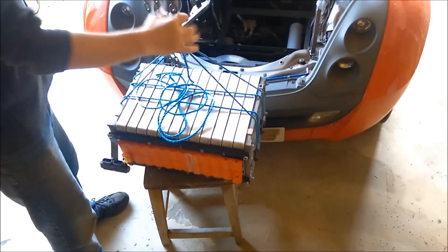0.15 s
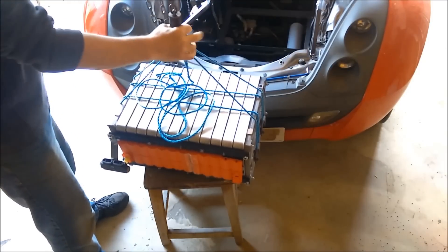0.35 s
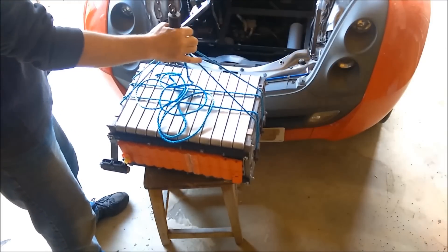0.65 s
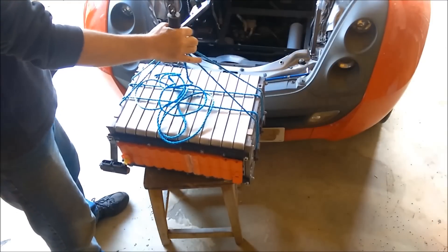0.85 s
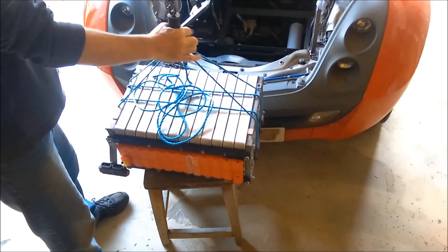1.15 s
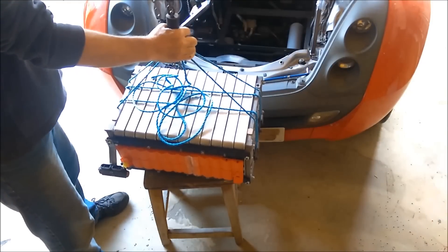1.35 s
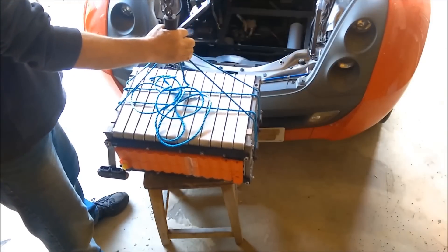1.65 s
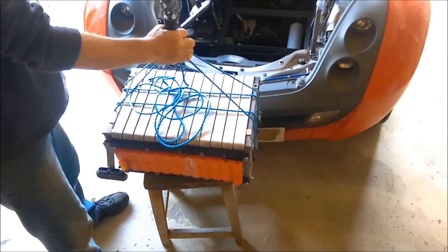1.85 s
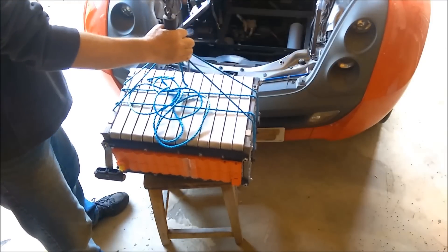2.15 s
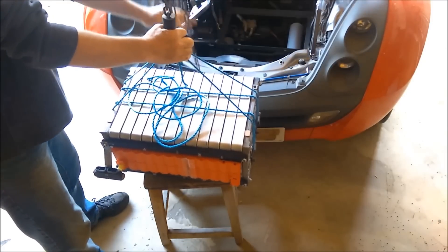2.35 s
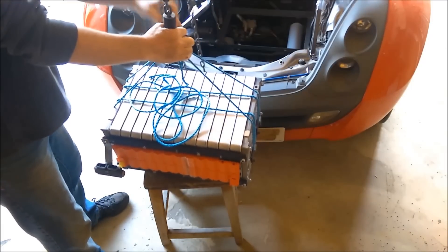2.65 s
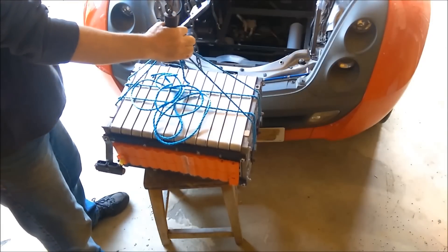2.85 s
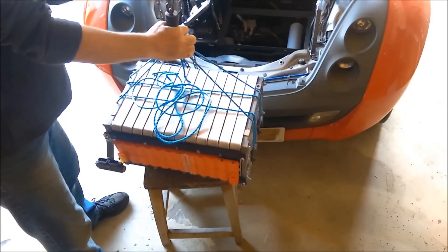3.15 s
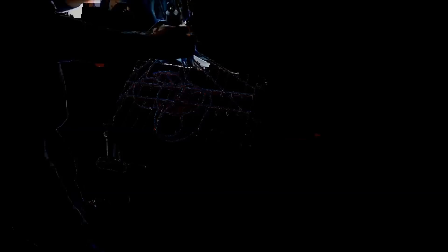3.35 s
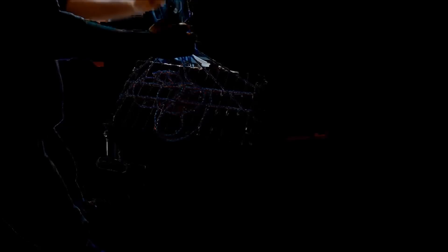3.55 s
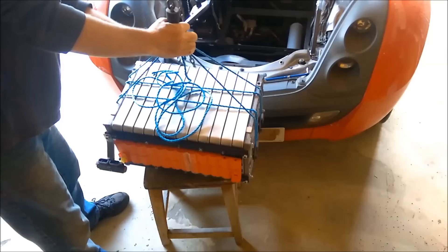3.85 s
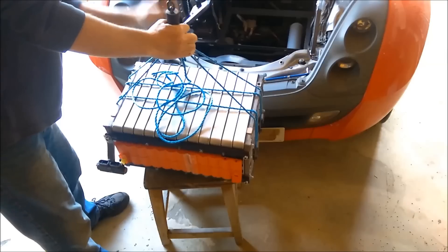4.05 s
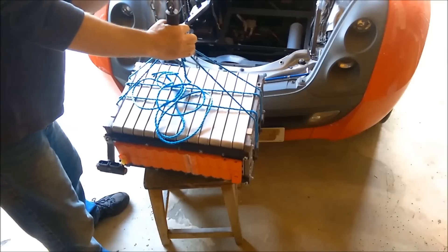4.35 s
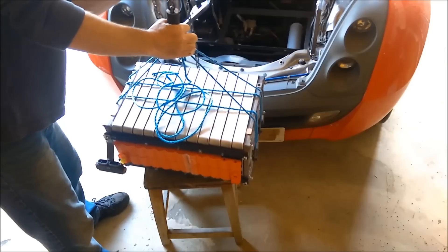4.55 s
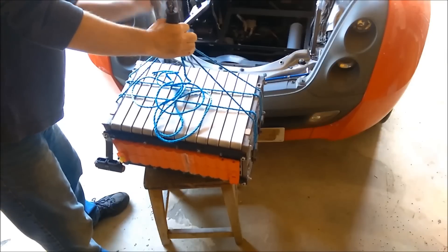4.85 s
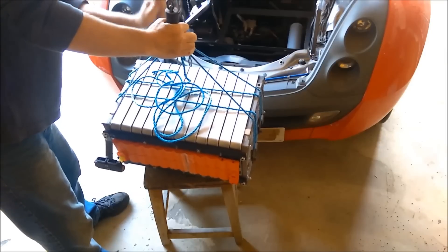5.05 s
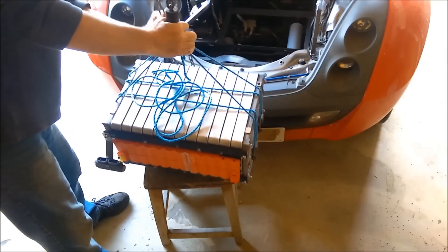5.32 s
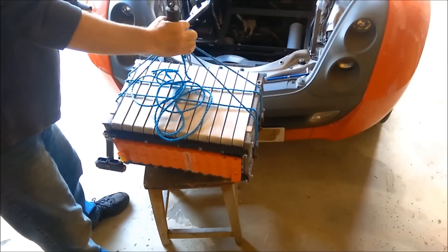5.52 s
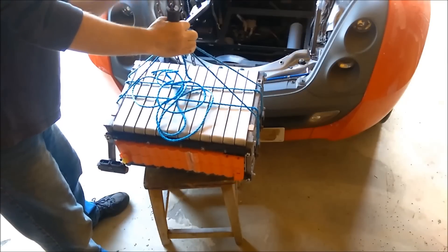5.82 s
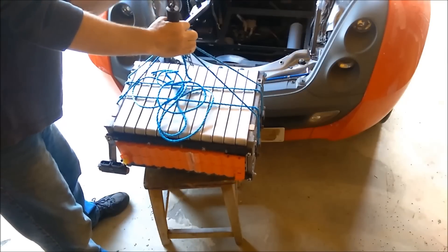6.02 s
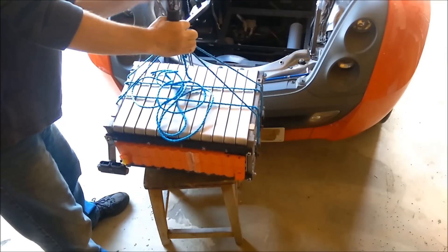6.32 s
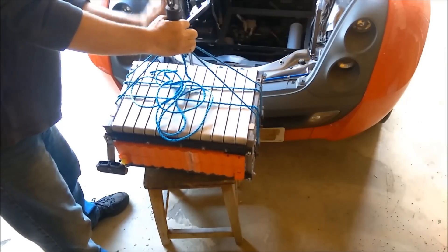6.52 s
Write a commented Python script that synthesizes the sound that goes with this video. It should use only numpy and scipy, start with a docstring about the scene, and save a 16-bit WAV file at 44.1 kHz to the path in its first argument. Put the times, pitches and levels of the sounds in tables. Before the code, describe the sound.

Close up, chain is hauled through a metal hoist in short rattling bursts. Sharp pawl snaps lead into rapid bright ticking and ringing clatter over a rumbling gear train. Pauses hold swinging slack, scrapes, clinks and thin steel pings, with a few muffled thumps. A hard metallic knock comes late, then two final brief pulls. The garage adds a short reverberant tail.

```python
"""A hand chain hoist lifts a heavy load in a garage, close by, over a faint steady background.
A brief treble hiss, perhaps a sleeve swish, comes first; then slack links clink: scraped noise bursts and
link modes. A pawl snap, a short noise chatter, precedes the first of seven tugs. In each tug the pawl ticks
once a tooth, the chain clatters over its wheel and rings the housing modes, and the gears rumble as filtered
impacts. Between tugs the slack loop swings, clinks and pings, and the load bumps dully; the garage echoes."""
import sys
import numpy as np
from scipy import signal
from scipy.fft import rfft, irfft
from scipy.io import wavfile
from scipy.ndimage import uniform_filter1d

SR = 44100
rng = np.random.default_rng(int(sys.argv[2]) if len(sys.argv) > 2 else 0)


def wrap_up_sound(samples):
    """Save the sound to the file named by the first command line argument, as 16-bit audio."""
    columns = np.atleast_2d(samples).T
    # keep every value between -1 and 1, then stretch to whole-number steps
    tamed = np.clip(columns, -1, 1)
    steps = np.round(tamed * 32767).astype(np.int16)
    wavfile.write(sys.argv[1], SR, steps)


N = 294588
TIME = np.arange(N) / SR


def undb(db):
    """Decibels to gain."""
    return 10 ** (np.asarray(db) / 20)


def unit(x):
    """Scale to rms 1."""
    return x / np.sqrt(np.mean(x ** 2))


def unit_hit(x):
    """Scale a stereo response to mean channel energy 1."""
    return x / np.sqrt(np.sum(x ** 2) / 2)


def pan(db):
    """Channel gains for a left minus right level."""
    return undb(np.array([[db], [-db]]) / 2)


def at_hz(points, hz):
    """Read (Hz, value) points on a log axis."""
    point_hz, value = np.transpose(points)
    return np.interp(np.log(hz + 1), np.log(point_hz), value)


def colour(x, points, power=1):
    """Filter by a smooth (Hz, dB) curve."""
    n = x.shape[-1]
    gain = undb(power * at_hz(points, np.fft.rfftfreq(n, 1 / SR)))
    return irfft(rfft(x) * gain, n)


def noise(n):
    """Unrelated noise for both channels."""
    return rng.standard_normal((2, n))


def add(out, start_s, sound):
    """Mix a sound in at a time."""
    i = int(np.clip(start_s * SR, 0, N - 1))
    out[:, i:i + sound.shape[1]] += sound[:, :N - i]


def ring(x, response):
    """Pass a signal through a stereo response."""
    return signal.fftconvolve(np.atleast_2d(x), response, axes=1)[:, :N]


def crack(spectrum, decay_s, rise_s=0, size=8192):
    """A hard contact: a burst that dies quickly; a scraping one takes a moment to build."""
    t = np.arange(size) / SR
    envelope = np.exp(-t / decay_s) * -np.expm1(-t / (rise_s + 1 / SR))
    return unit_hit(colour(noise(size), spectrum) * envelope)


def steel(modes, detune, spread_db, size=8192):
    """Decaying modes; each point of contact weights and detunes them anew."""
    hz, width_hz, db = np.transpose(modes)[:, :, None]
    hz = hz * (1 + detune * rng.standard_normal(hz.shape))
    gain = np.sqrt(width_hz) * undb(db + spread_db * rng.standard_normal(hz.shape))
    phases = np.exp(2j * np.pi * rng.random((2, len(modes))))
    poles = np.exp(np.pi * (2j * hz - width_hz) / SR)
    rings = np.cumprod(np.repeat(poles, size, axis=1), axis=1)
    return unit_hit(np.einsum('cm,mt->ct', phases * gain.T, rings).imag)


def collisions(rate_hz, spread_db):
    """Randomly timed impacts of uneven strength."""
    chance = rng.random(N)
    strength = undb(spread_db * np.clip(rng.standard_normal(N), -2, 2))
    return (chance < rate_hz / SR) * strength


def unevenness(db, hold_s, size):
    """A gain that wanders at random from moment to moment."""
    wander = uniform_filter1d(rng.standard_normal(size), size=int(hold_s * SR) + 1)
    return undb(db * unit(wander))


def stroke(start, end, db, attack_s, release_s, change_db=0):
    """Gain of one movement: it builds up just before its start, holds, and dies away after its end."""
    attack = np.clip(1 + (TIME - start) / attack_s, 0, 1)
    release = np.exp(-np.maximum(TIME - end, 0) / release_s)
    progress = np.clip((TIME - start) / (end - start), 0, 1)
    return attack * release * undb(db + change_db * progress)


# Colour of the still garage. Each row: frequency in Hz, level in dB.
STILL = [(25, -10), (70, -1), (130, -5.5), (250, -9), (450, -12.5), (800, -8), (1500, -14.5), (5000, -21.5),
         (15000, -24.5)]


def still_garage(level_db=-46.0):
    """Faint steady background: coloured noise."""
    return undb(level_db) * unit(colour(noise(N), STILL))


# Tugs on the hand chain. Each row: start in seconds, end in seconds, ratchet teeth passed, slowing 0-1,
# clatter in dB, clatter change by the end in dB, tick in dB, gears in dB; levels are relative.
TUGS = [(0.796, 0.978, 4, .1, -20, -6, 13, -33.5), (2.03, 2.524, 18, 0.08, -19, 0, 9.5, -36),
        (3.389, 3.952, 17, 0.02, -20.5, 1, 10.5, -38), (4.9453, 5.192, 7, .29, -18.5, -2.5, 10, -36.5),
        (5.491, 5.688, 6, .22, -23.5, -7, 10, -41), (6.234, 6.341, 2, 0, -26, -2, -18, -36.5),
        (6.42, 6.702, 8, 0.01, -20.5, 10.5, 9.5, -36)]
TUG_ATTACK_S, TUG_RELEASE_S = 0.022, 0.004


def hand_pull():
    """Gain of the chain's motion over all tugs."""
    return sum(stroke(start, end, db, TUG_ATTACK_S, TUG_RELEASE_S, change_db)
               for start, end, _, _, db, change_db, _, _ in TUGS)


def tooth_times(start, end, teeth, slowing, every=1):
    """When every so many teeth pass the pawl; the wheel slows as the arm runs out of travel."""
    last = round(teeth) - 1
    turned = np.arange(0, last + .5, every) / last
    return start + (end - start) * turned * (1 - slowing * (1 - turned))


def rubbed(response, rub_s=0.012):
    """A link that slips along its neighbour is rung by a short run of tiny catches."""
    t = np.arange(response.shape[1]) / SR
    catches = rng.standard_normal(len(t)) * np.exp(-t / rub_s)
    return unit_hit(ring(catches, response)[:, :len(t)])


# A brief treble hiss, perhaps a sleeve swish (first row), then knocks of slack links, all made alike.
# Each row: start in seconds, relative level in dB, gain at 10 kHz in dB.
HISS_AND_CLINKS = [(0.0298, -19.5, 17.5), (0.403, -6.5, -1.5), (0.632, -7.5, -8), (1.28, -0.5, -9.5),
                   (1.3852, -8.5, -10), (1.8241, -2, -22), (2.8609, 0, -1.5), (2.9521, 3.5, -6.5),
                   (3.1328, -4.5, -9), (3.255, -4.5, -3), (3.35, -4, -7), (3.3705, 6.5, -5),
                   (4.1916, 3, -4), (4.2762, -2, -6.5), (4.3686, -3, -14.5), (4.5019, 7, -3),
                   (4.6044, 3.5, 2), (4.6251, 5, -37), (5.7775, 6, -5), (5.9736, 2, -10), (5.9962, 2, -3),
                   (6.139, 7, -6.5), (6.2344, 9, -6)]
# Swings of the slack loop after a tug. Each row: start in seconds, end in seconds, jingle in dB,
# gears in dB; levels are relative.
SWINGS = [(0.997, 1.037, -18, -46), (2.456, 2.576, -23.5, -56), (2.629, 2.743, -19, -38),
          (3.945, 4.031, -20, -32.5), (4.083, 4.107, -14, -32.5), (5.206, 5.238, -25.5, -37),
          (5.624, 5.72, -23.5, -41)]
SWING_ATTACK_S, SWING_RELEASE_S = 0.0079, 0.017
# Single links slip and ring out. Each row: start in seconds, relative level in dB, ring in Hz.
PINGS = [(1.39, -21, 8160), (1.988, 2, 5345), (2.54, -10, 2160), (2.657, 5, 5350), (2.715, 5, 5360),
         (2.865, -14, 6200), (3.257, -13, 3280), (3.37, -3, 5280), (3.48, 6.5, 5280), (3.98, 4, 2135),
         (4.084, 3.5, 5390), (4.191, 1, 2185), (4.277, -6, 13900), (4.503, -8, 10650), (4.606, -7, 6260),
         (5.998, -5, 4070)]
# Modes of a freely ringing link. Each row: multiple of its ring, width in Hz, level in dB.
FREE_LINK = [(1, 40, 8), (1.018, 80, -6), (1.16, 40, -19)]
# Modes of the hand chain's links. Each row: frequency in Hz, width in Hz, level in dB.
LINK = [(993, 87, -6), (1143, 37, -13.5), (2120, 15, -4), (2416, 100, -17), (3238, 78, 7.5),
        (3955, 84, 4.5), (5370, 72, -4.5), (6180, 38, 7), (7950, 18, 5), (9970, 61, -29), (9550, 70, 11),
        (10700, 45, -17)]
# Colour of slack links touching. Each row: frequency in Hz, level in dB.
SLACK = [(300, -8.5), (900, 1), (2400, 9.5), (4000, 1), (6200, 2), (10000, 1.5), (15500, -3)]


def slack_chain(pull, rate_hz=150, level_db=-3.0, ring_db=-4.5, pull_db=-10, clink_ring_db=-8, count=8):
    """After a brief hiss, the hanging loop jingles with tugs and swings on; single links knock and ring."""
    swing = sum(stroke(start, end, db, SWING_ATTACK_S, SWING_RELEASE_S) for start, end, db, _ in SWINGS)
    swing = swing + undb(pull_db) * pull
    out = 0
    for _ in range(count):
        touch = crack(SLACK, 0.011, 0.0012) + undb(ring_db) * steel(LINK, 0.023, 3.7)
        out = out + ring(unit(collisions(rate_hz / count, 0.4)) * swing, touch)
    out *= undb(level_db) / np.sqrt(2 * count)
    for s, db, treble_db in HISS_AND_CLINKS:
        scrape = crack(SLACK, 0.023, 0.009)
        scrape = unit_hit(scrape * unevenness(3.5, .003, scrape.shape[1]))
        contact = scrape + undb(clink_ring_db) * rubbed(steel(LINK, 0.0135, 5.6))
        add(out, s, undb(db) * colour(contact, [(3000, 0), (10000, treble_db)]))
    for s, db, hz in PINGS:
        modes = [(hz * multiple, width_hz, mode_db) for multiple, width_hz, mode_db in FREE_LINK]
        add(out, s, undb(db) * rubbed(steel(modes, 0.0075, 3.1)))
    # the loop hangs to the right; left minus right in (Hz, dB)
    loop_pan = [(1000, -6.0), (3000, -3.0), (6000, -14), (11000, -14.5)]
    return colour(out, loop_pan, np.array([[.5], [-.5]]))


# Garage reverberation. Each row: frequency in Hz, t60 in seconds.
GARAGE = [(200, 0.28), (1300, 0.42), (3500, 0.39), (9000, 0.3), (15000, 0.18)]
TAIL_CYCLE_HZ = 1.3  # how often the tails come round again


def garage(dry, wet_db=-1, size=24000, count=4):
    """Walls and floor echo, treble dying first; dense tails fade into one another at a steady slow rate."""
    t = np.arange(size) / SR
    edges_hz = [20, 500, 1200, 2500, 5000, 8000, 12000, 20000]
    hz = np.fft.rfftfreq(size, 1 / SR)
    shares = np.array([np.cos(np.pi * (TAIL_CYCLE_HZ * TIME + k / count)) ** 3 for k in range(count)])
    wet = 0
    for share in shares / np.linalg.norm(shares, axis=0):
        spectrum, tail = rfft(noise(size)), 0
        for lo, hi in zip(edges_hz, edges_hz[1:]):
            band = irfft(spectrum * ((hz >= lo) & (hz < hi)), size)
            tail = tail + band * np.exp(-np.log(1000) * t / at_hz(GARAGE, (lo + hi) / 2))
        build_up = np.clip(t / 0.0096, 0, 1)
        wet = wet + ring(dry * share, unit_hit(tail * build_up))
    return dry + undb(wet_db) * wet


# Colour of the pawl's chatter. Each row: frequency in Hz, level in dB.
PAWL = [(400, -33), (2000, -10.5), (4500, -9.5), (7500, -5.5), (10500, 0.5), (13200, 6), (15500, -9)]
CHATTER_RISE_S = .002


def chatter(length_s, size=8192):
    """The pawl buzzes against its tooth for a moment, then seats abruptly."""
    t = np.arange(size) / SR
    bounce = unevenness(0.83, 0.0014, size)
    seated = np.exp(-(t / length_s) ** 4)
    return unit_hit(colour(noise(size), PAWL) * bounce * seated * -np.expm1(-t / CHATTER_RISE_S))


# At a jerk the pawl snaps over a tooth. Each row: start in seconds, relative level in dB, chatter in seconds.
SNAPS = [(0.7232, 14.5, 0.051), (0.9349, 14, 0.012), (1.8472, 16, 0.015), (2.0168, 17.5, 0.012),
         (2.0857, 16, 0.013), (3.467, 16, 0.016), (3.8494, 18.5, 0.014), (4.5, 4, 0.021),
         (4.7836, 17, 0.022), (4.8957, 16.5, 0.011), (5.2739, 18, 0.018), (5.4378, 16.5, 0.012),
         (5.4943, 16, 0.02), (6.138, 1, 0.009), (6.2811, 16, 0.023), (6.4007, 14, 0.021),
         (6.482, 14.5, .016)]
# Colour of the tick on a passing tooth. Each row: frequency in Hz, level in dB.
TOOTH = [(1000, -30), (6000, -24), (10000, -12.5), (12800, -2), (15500, -12.5)]
TICK_DECAY_S, TICK_RISE_S, TICK_SCATTER_DB = .006, .0012, .8
# Modes of the hoist housing. Each row: frequency in Hz, width in Hz, level in dB.
HOUSING = [(984, 88, -1), (1652, 48, -7.5), (2206, 9.7, 4.5), (2475, 55, 4), (2683, 100, 2), (3328, 70, 6),
           (4220, 47, 0), (5315, 39, 0), (5930, 130, 1), (7050, 180, 1), (8880, 20, 5.5), (10060, 180, 5),
           (11900, 100, -30), (12760, 390, 4.5)]


def ratchet(tick_pan_db=-6, snap_pan_db=-13, snap_ring_db=-11):
    """The pawl ticks once a tooth; at a jerk it snaps down and chatters."""
    ticks, snaps = np.zeros((2, 2, N))
    for start, end, teeth, slowing, _, _, tick_db, _ in TUGS:
        for s in tooth_times(start, end, teeth, slowing):
            db = tick_db + TICK_SCATTER_DB * rng.standard_normal()
            add(ticks, s, undb(db) * crack(TOOTH, TICK_DECAY_S, TICK_RISE_S))
    for s, db, chatter_s in SNAPS:
        top_ring = steel(HOUSING[-4:], 0.018, 2.0)  # the four highest modes
        add(snaps, s, undb(db) * (chatter(chatter_s) + undb(snap_ring_db) * top_ring))
    return ticks * pan(tick_pan_db) + snaps * pan(snap_pan_db)


# Colour of the clattering contacts. Each row: frequency in Hz, level in dB.
CLATTER = [(200, -17), (500, -11), (900, -4.5), (1500, 3), (2500, 1.5), (4500, 1.5), (7500, -0.5),
           (12000, 2.5), (15500, -19)]
KNOCK_RISE_S = .0015


def knock(hz, answer_db=-2, thud_db=-14):
    """A blow on the housing; where it lands decides which resonance answers most; the frame thuds."""
    answer = steel([(hz, 40, 0), (1.4 * hz, 70, -4)], 0.0022, 0.35)
    housing = steel(HOUSING, 0.024, 3.7)
    blow = crack(CLATTER, 0.013, KNOCK_RISE_S) + undb(-1) * housing + undb(answer_db) * answer
    thud = crack(GEARS, 0.031, 0.0022)
    return colour(blow, [(3500, -1.5), (10000, -3.5)]) + undb(thud_db) * thud


def rattle(ring_db):
    """One link strikes the guide: a short crack and the housing's ring."""
    return crack(CLATTER, 0.0062, 0.00088) + undb(ring_db) * steel(HOUSING, .022, 3.1)


# The chain jerks against the housing. Each row: start in seconds, relative level in dB, answering ring in Hz.
KNOCKS = [(0.98, -1, 2510), (2.177, -7, 3340), (2.469, 1.5, 2160), (2.635, -5, 2190), (4.498, -2, 3070),
          (5.398, 3, 2394), (5.541, 10.5, 2487)]
# Left minus right of the wheel's clatter. Each row: frequency in Hz, difference in dB.
WHEEL_PAN = [(500, 16), (2400, 7.5), (4400, 8), (8000, 0.5), (14000, -7)]
SNAP_KNOCK_DB, SNAP_KNOCK_HZ = -16.5, 3288  # level relative to the snap
# shake and seat levels are relative to the tug's clatter
SHAKE_DB, SHAKE_SCATTER_DB = 19, -0.5
TEETH_PER_LINK, SEAT_DB, SEAT_HZ, SEAT_SCATTER_DB, SEAT_DETUNE = 2.75, 24.5, 2364, 2, 0.0346


def wheel(pull, rate_hz=120, ring_db=2, level_db=-5.0, count=10):
    """Links rattle in the guide, shaken by each tooth, and seat in pockets; jerks and snaps jolt the housing."""
    out = 0
    for _ in range(count):
        out = out + ring(unit(collisions(rate_hz / count, 9.3)) * pull, rattle(ring_db))
    out *= undb(level_db) / np.sqrt(2 * count)
    for s, db, hz in KNOCKS:
        add(out, s, undb(db) * knock(hz))
    for s, db, _ in SNAPS:
        add(out, s, undb(db + SNAP_KNOCK_DB) * knock(SNAP_KNOCK_HZ))
    for start, end, teeth, slowing, clatter_db, *_ in TUGS:
        for s in tooth_times(start, end, teeth, slowing):
            shake_db = clatter_db + SHAKE_DB + SHAKE_SCATTER_DB * rng.standard_normal()
            add(out, s, undb(shake_db) * rattle(ring_db))
        for s in tooth_times(start, end, teeth, slowing, every=TEETH_PER_LINK):
            strength, pitch = rng.standard_normal(2)
            seat_db = clatter_db + SEAT_DB + SEAT_SCATTER_DB * strength
            add(out, s, undb(seat_db) * knock(SEAT_HZ * (1 + SEAT_DETUNE * pitch)))
    return colour(out, WHEEL_PAN, np.array([[.5], [-.5]]))


# Colour of the gears. Each row: frequency in Hz, level in dB.
GEARS = [(30, -5), (80, -6), (120, 0.5), (160, 1.5), (230, -1), (330, 0.5), (500, -5.5), (1000, 1.5),
         (3000, -17)]
# The hanging load bumps as the chain settles. Each row: start in seconds, relative level in dB.
BUMPS = [(2.726, 2.5), (3.946, 3), (4.099, 1), (4.147, 2.5)]
GEAR_ATTACK_S, GEAR_RELEASE_S = 0.062, 0.078


def gears(rate_hz=110, level_db=6, count=4):
    """Loaded teeth rumble through the frame as the chain moves, and the load bumps; partly opposite in phase."""
    strain = np.sqrt(sum(stroke(start, end, db, GEAR_ATTACK_S, GEAR_RELEASE_S) ** 2
                         for start, end, *_, db in TUGS + SWINGS))
    teeth = sum(ring(collisions(rate_hz / count, 3.9), crack([(30, 0), (3000, 0)], 0.0093))
                for _ in range(count))
    frame = undb(level_db) * strain * unit(colour(teeth, GEARS))
    bump_colour = [(60, -17), (160, 18), (300, 6), (500, -36), (2000, -50)]
    for s, db in BUMPS:
        add(frame, s, undb(db) * crack(bump_colour, 0.013, 0.0055))
    shared, own = frame
    return np.array([shared, undb(-7.5) * own - undb(-5.5) * shared])


def scene():
    """The hoist in its garage, over a faint steady background."""
    pull = hand_pull()
    hoist = slack_chain(pull) + ratchet() + wheel(pull)
    return still_garage() + garage(hoist) + gears()


TOP_HZ = 15900


def record(dry):
    """Peaks clip at full scale, as when the sharpest snaps overload a recorder; the top is cut."""
    low_pass = signal.ellip(10, .2, 70, TOP_HZ, fs=SR, output="sos")
    return signal.sosfilt(low_pass, np.clip(dry, -1, 1))


dry = scene()
out = record(dry)
wrap_up_sound(out)
```